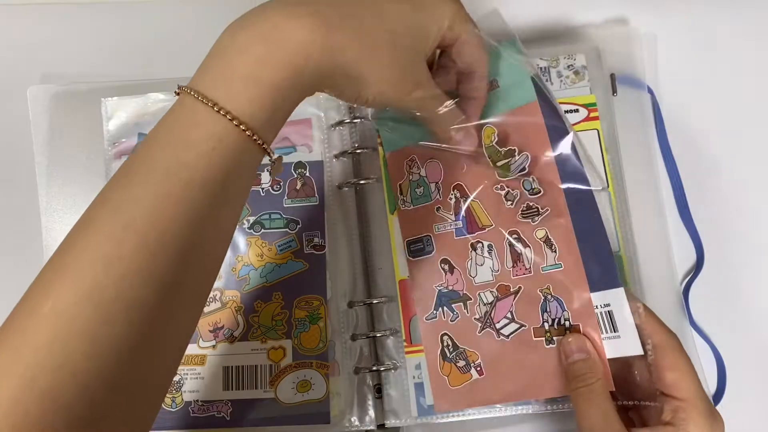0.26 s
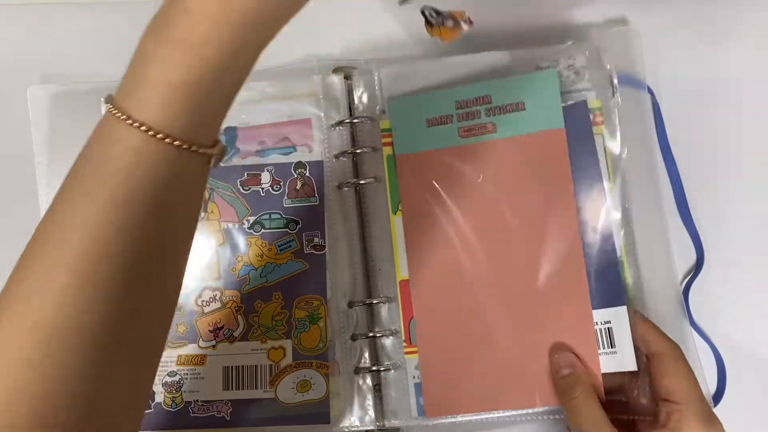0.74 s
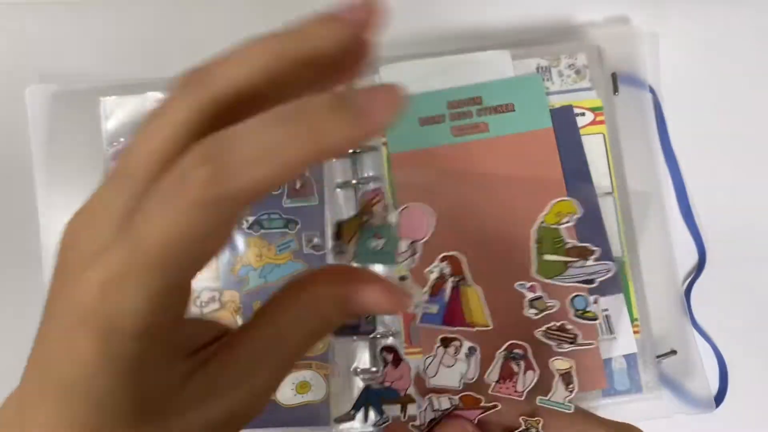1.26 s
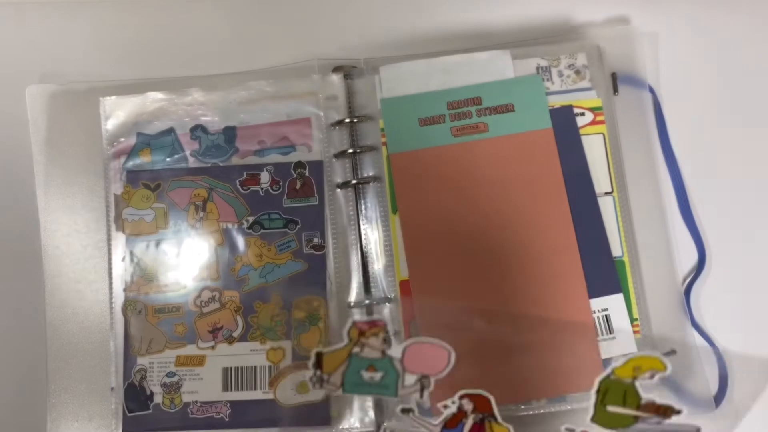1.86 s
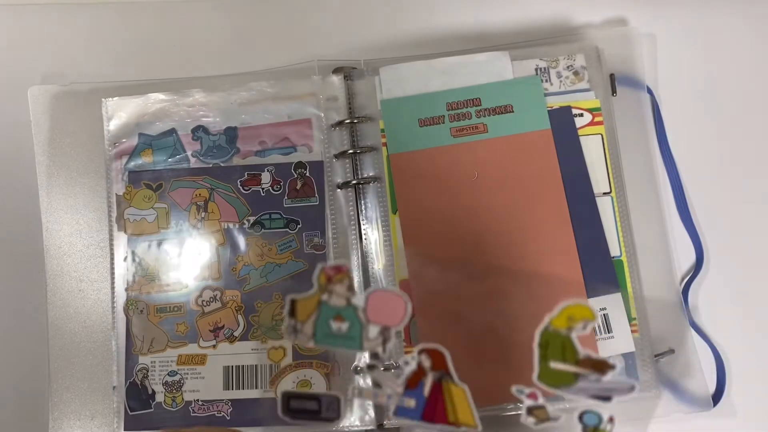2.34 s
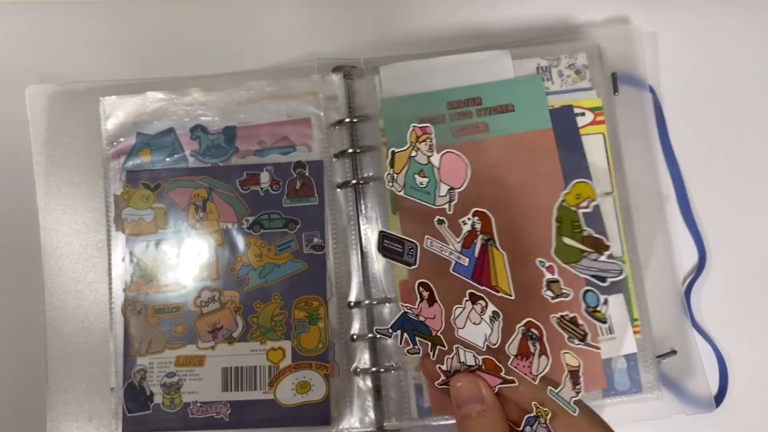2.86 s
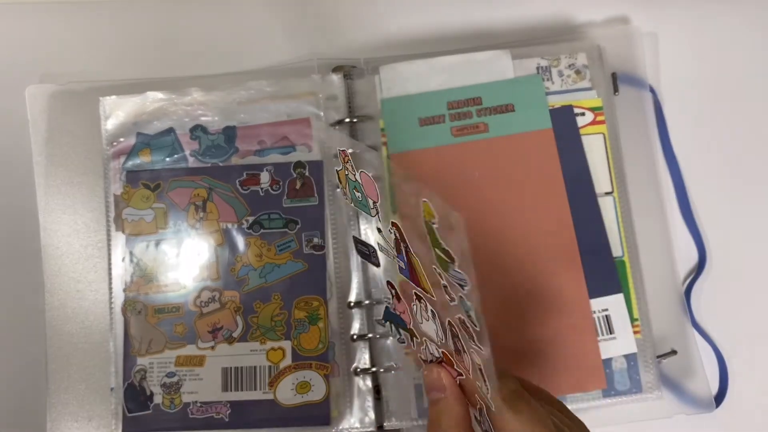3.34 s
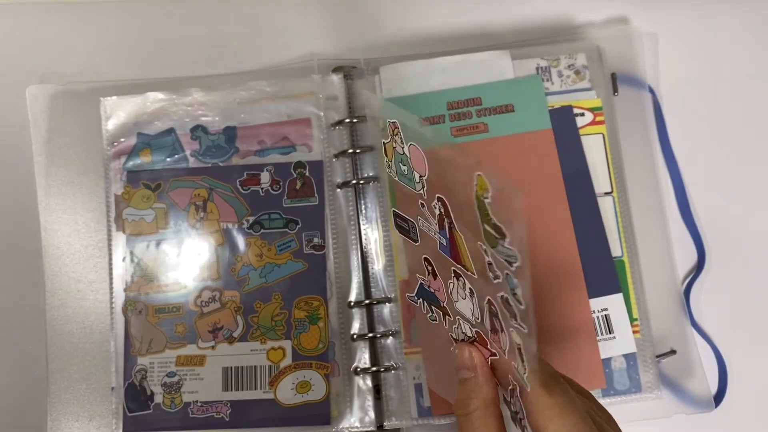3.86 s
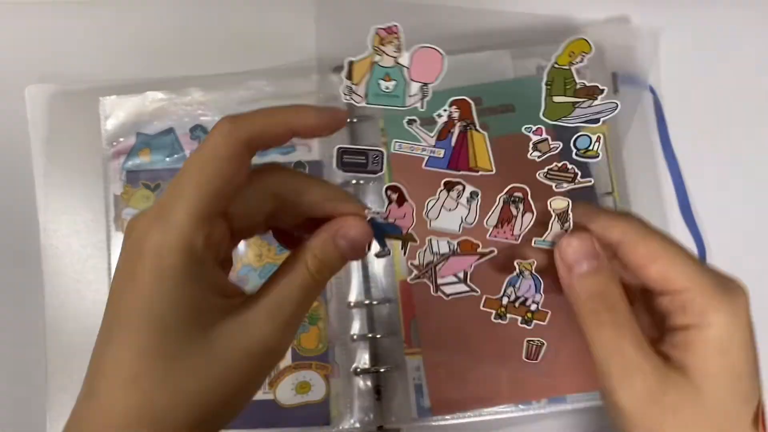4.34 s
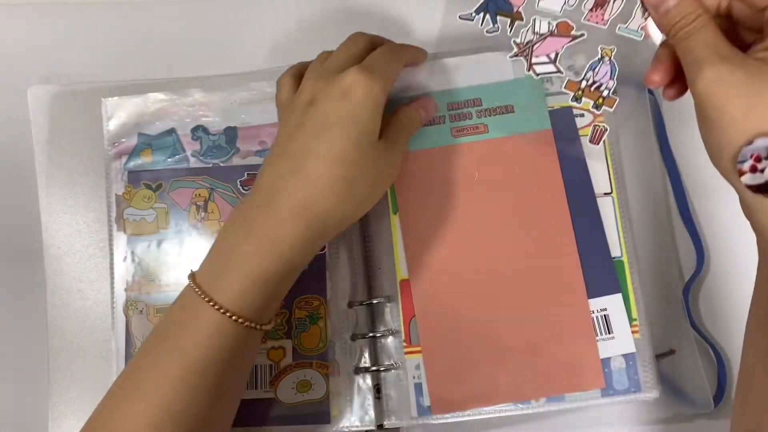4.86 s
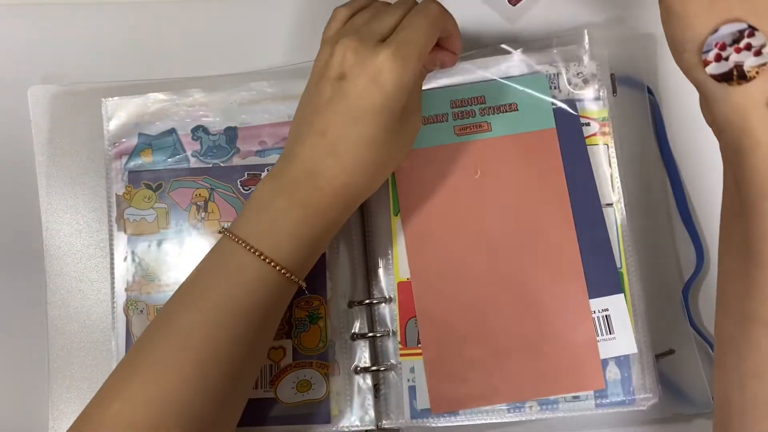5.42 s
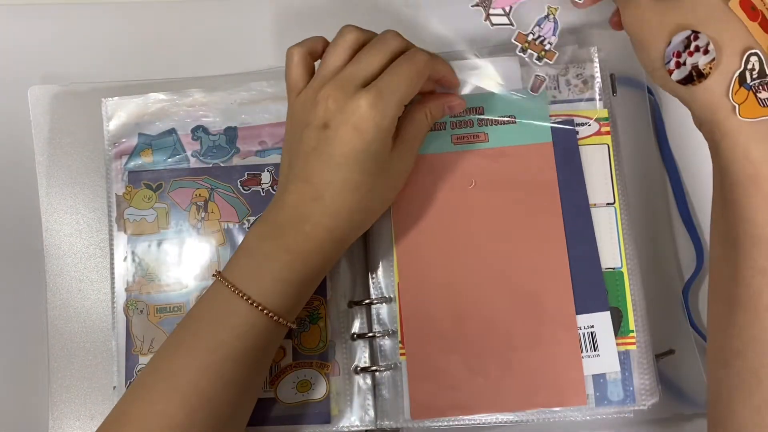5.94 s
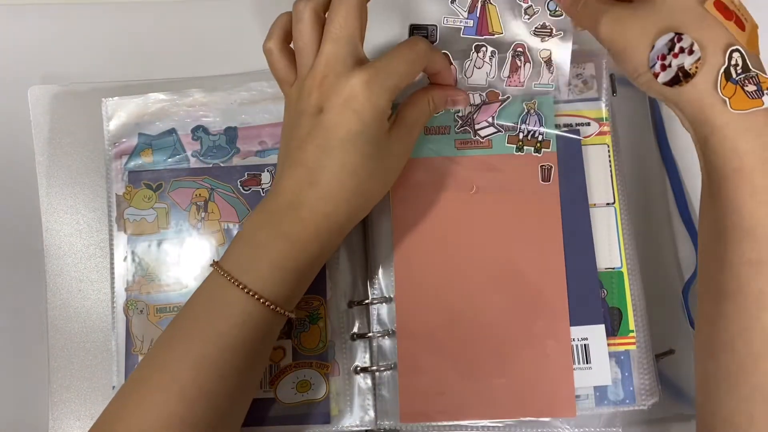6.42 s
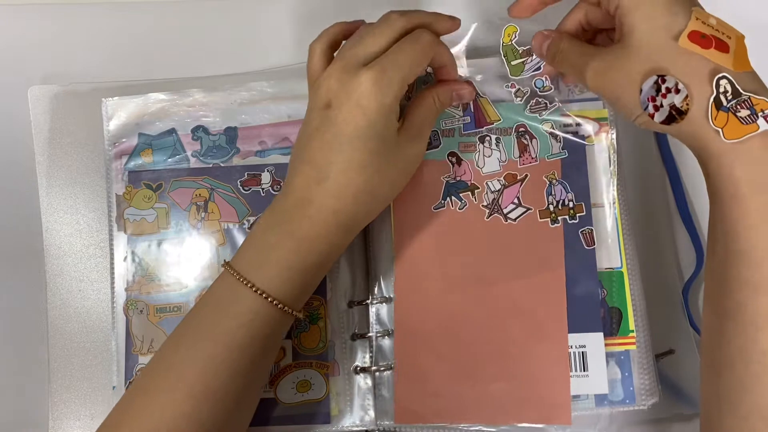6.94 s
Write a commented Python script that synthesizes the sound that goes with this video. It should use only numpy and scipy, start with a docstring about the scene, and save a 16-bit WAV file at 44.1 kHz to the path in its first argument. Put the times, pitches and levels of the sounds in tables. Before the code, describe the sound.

Close dry plastic snaps and sliding hiss, a quiet gap, a sharp crackle, then softer crinkling, with low hum and a vehicle fading early.

```python
"""Handling a stiff plastic sheet

A sticker sheet is drawn out of a binder sleeve, flexed in the hand and pushed back in, close by in a small room.
Buckles snap as dispersed ticks and crackle, slow bends ring sinking modes, and sliding film is filtered
random slips with small creases ticking. An appliance (wavering tones and shaped noise) hums throughout;
a distant vehicle (road noise, rumble and whine) fades away in the first seconds."""
import sys
import numpy as np
from scipy import signal
from scipy.fft import rfft, irfft
from scipy.io import wavfile
from scipy.ndimage import uniform_filter1d

SR = 44100
rng = np.random.default_rng(int(sys.argv[2]) if len(sys.argv) > 2 else 0)


def digitize_waveform(pressure):
    """Quantize a signal to 16-bit integers and store it at the path in sys.argv[1].

    Rows of a 2-D input are taken as channels; values are limited to [-1, 1].
    """
    field = np.atleast_2d(pressure).T
    bounded = np.clip(field, -1, 1)
    quanta = np.round(bounded * 32767).astype(np.int16)
    wavfile.write(sys.argv[1], SR, quanta)


N = 316638
TIME = np.arange(N) / SR  # [s]
BINS = np.fft.rfftfreq(N, 1 / SR)  # [Hz]
DAMPING_HZ = 2545  # reference frequency for the film's damping and dispersion


def gain_of(db):
    """Level to amplitude: twenty decibels are a factor of ten."""
    return 10 ** (np.asarray(db) / 20)


def evened(x):
    """Normalisation: scales a signal to an rms of one."""
    return x / np.sqrt(np.mean(x ** 2) + 1e-20)


def read(points, hz):
    """Spectral interpolation: reads a table on a logarithmic frequency axis."""
    f, value = np.transpose(points)
    return np.interp(np.log(hz + 1), np.log(f + 1), value)


def add(mix, s, sound):
    """Superposition: adds a sound into the mix at time s."""
    part = mix[max(round(s * SR), 0):][:len(sound)]
    part += sound[:len(part)]


def drift(rate_hz):
    """Slow random fluctuation: low-passed noise with an rms of one."""
    noise = rfft(rng.standard_normal(N))
    return evened(irfft(noise / (1 + (BINS / rate_hz) ** 4), N))


def hump(hz, centre_hz, width_hz):
    """Resonance curve: a Lorentzian peak of height one."""
    return 1 / (1 + (2 * (hz - centre_hz) / width_hz) ** 2)


def sheet_db(hz):
    """Plate resonance: the modes that colour the film's snaps and friction."""
    # ringing of the sheets and the binder: (centre [Hz], width [Hz], peak height [dB])
    modes = [(1116, 44, 0), (1570, 51, 4.5), (1945, 38, 4), (2550, 52, 5), (3100, 70, 1), (4230, 87, 4.5)]
    return sum(db * hump(hz, centre, width) for centre, width, db in modes)


def causal(db):
    """Minimum phase: the response with this gain that rings only after it is struck."""
    log_gain = np.log(gain_of(np.r_[db, db[-2:0:-1]]))
    return np.exp(np.conj(signal.hilbert(log_gain)))[:len(db)]


def resonate(x, hz, width_hz):
    """Tracking resonance: a double pole in a rotating frame follows a pitch curve."""
    turn = np.exp(2j * np.pi * np.cumsum(hz) / SR)
    r = np.exp(-np.pi * width_hz / SR)
    smoothed = signal.lfilter([(1 - r) ** 2], [1, -2 * r, r * r], x / turn)
    return 2 * (turn * smoothed).real


def ambient(spectrum):
    """Diffuse field: two noise channels whose correlation depends on frequency."""
    # likeness of the two sides for sound from all around: (frequency [Hz], correlation [-1 to 1])
    likeness = [(60, 0.44), (130, 1), (290, 0.066), (640, -0.82), (3000, -0.17)]
    a, b = rfft(rng.standard_normal((2, N)))
    same = np.clip(read(likeness, BINS), -1, 1)
    pair = np.array([a, same * a + np.sqrt(1 - same ** 2) * b])
    return evened(irfft(pair * gain_of(read(spectrum, BINS)), N))


def appliance(hum_hz=60, overtones_db=2.5, air_db=-58, waver=0.0013):
    """Motor hum and flow noise: wavering tones over a rush of air."""
    # level of the fundamental: (time [s], rms level [dB])
    hum_levels = [(0, -49.5), (0.2, -57.5), (0.7, -44.5), (1.15, -48.5), (1.35, -55.5), (2.13, -44.5),
                  (2.35, -46.5), (7.1, -50.5)]
    # higher tones, all lifted by overtones_db: (nominal frequency [Hz], relative level [dB])
    overtones = [(118.4, -66), (236.9, -77), (279.9, -71.5)]
    # spectrum of the rushing air: (frequency [Hz], relative level [dB])
    air = [(30, -36), (52, 7.5), (72, -6), (110, -2.5), (180, -12.5), (285, -10), (420, -17.5), (720, -25),
           (1500, -41), (8000, -52), (16000, -75.5)]
    hum_gain = gain_of(np.interp(TIME, *np.transpose(hum_levels)))
    hum = hum_gain * np.sin(2 * np.pi * np.cumsum(hum_hz * (1 + waver * drift(0.87))) / SR)
    for hz, db in overtones:
        tone_gain = gain_of(db + overtones_db + drift(7.9))
        hum += tone_gain * np.sin(2 * np.pi * np.cumsum(hz * (1 + waver * drift(4.3))) / SR)
    return np.sqrt(2) * hum + gain_of(air_db) * ambient(air)


def vehicle(lumps_db=2.5, lumps_hz=7):
    """Passing source: road noise, a lumpy rumble and a whine that mostly sinks in pitch."""
    # nominal course of the passage:
    # (time [s], road noise [dB], engine rumble [dB], whine pitch [Hz], whine level [dB])
    passage = [(0, -59.5, -47, 326.6, -60.5), (0.799, -54.5, -53, 307.8, -55.5),
               (1.25, -58, -57, 296.8, -58.5), (1.5, -56.5, -54, 288, -64.5),
               (2.15, -57.5, -47.5, 283, -71.5), (2.35, -80, -64, 287, -71.5)]
    # spectra of tyre noise and engine: (frequency [Hz], relative level [dB])
    road = [(100, -5.5), (200, 1.5), (600, 2), (1100, 1), (1700, -7), (2700, -11.5), (5800, -22),
            (11000, -51)]
    engine = [(35, -31), (52, -4), (70, -12.5), (95, 5.5), (125, -14.5), (185, -14), (400, -80)]
    s, *columns = np.transpose(passage)
    road_db, rumble_db, whine_hz, whine_db = (np.interp(TIME, s, c) for c in columns)
    whine_gain = np.sqrt(2) * gain_of(whine_db + 1.1 * drift(4))
    whine = whine_gain * np.sin(2 * np.pi * np.cumsum(whine_hz * (1 + 0.0084 * drift(7.0))) / SR)
    rumble = gain_of(rumble_db + lumps_db * drift(lumps_hz)) * ambient(engine)
    gone = np.clip((TIME - s[-1]) / 0.12, 0, 1)
    return (1 - gone) * (gain_of(road_db) * ambient(road) + rumble + whine)


def stroke_gains(attack_s=0.019, release_t60_s=0.047, release_share=0.99, held_db=-92.5):
    """Energy addition: strokes with attack, swelling hold and release sum as powers."""
    # strokes of film over film, drawing out, then flexing, then pushing back in:
    # (start [s], hold length [s], hiss [dB], deeper scrape [dB], swell from start to end [dB])
    strokes = [ (0.0, 0.045, -43.5, -49, 1), (0.078, 0.19, -60.5, -58.5, -1),
               (0.16, 0.074, -51.5, -53, -6.5), (0.28, 0.12, -51, -57.5, 11.5),
               (0.395, 0.0997, -46.5, -44.5, 5), (0.517, 0.18, -48.5, -60, 4),
               (0.871, 0.05, -61.5, -61.5, 10), (1.114, 0.075, -69.5, -46.5, 6.5),
               (2.15, .14, -60.5, -65, -3.5), (2.329, 0.29, -66, -68.5, 18.5),
               (2.619, 0.18, -76, -68.5, -26.5), (3.975, 0.2, -73, -85.5, -12.5),
               (4.129, 0.16, -64.5, -55.5, -7.5), (4.328, 0.16, -74, -76, -5.5),
               (4.553, 0.27, -78, -69, -16), (4.865, 0.086, -69.5, -76, -2),
               (4.981, 0.44, -71, -70.5, 12.5), (5.341, 0.019, -49, -59.5, 9),
               (5.413, 0.083, -53.5, -58.5, 1), (5.562, .27, -66, -66.5, 11),
               (5.848, .15, -51.5, -55.5, -2), (5.999, 0.21, -51, -61, -1.5),
               (6.259, 0.11, -71, -67, -24.5), (6.426, .14, -56.5, -71, 7), (6.579, .11, -69, -79, 2),
               (6.704, .16, -61.5, -73.5, -6), (6.872, .3, -65.5, -76.5, 10.5),]
    # the fingers never keep the sheet quite still, so a faint floor remains
    power = gain_of([[held_db], [held_db]]) ** 2 * np.ones(N)
    for start, length, hiss_db, scrape_db, swell_db in strokes:
        release_t60 = release_t60_s + release_share * length
        t = np.arange(0, length + release_t60, 1 / SR)
        swell = swell_db * (np.minimum(t / length, 1) - .5)
        release = -60 * np.maximum(t - length, 0) / release_t60
        envelope = np.minimum(t / attack_s, 1) * gain_of(swell + release)
        add(power[0], start, (gain_of(hiss_db) * envelope) ** 2)
        add(power[1], start, (gain_of(scrape_db) * envelope) ** 2)
    return np.sqrt(power)


def friction(spectrum, grains_per_s):
    """Stick-slip: countless tiny slips of uneven size, coloured by the sheet."""
    slips = rng.standard_normal(N) * (rng.random(N) < grains_per_s / SR)
    colour_db = read(spectrum, BINS) + sheet_db(BINS)
    return evened(irfft(rfft(slips) * gain_of(colour_db), N))


def bending(x, echo=0.54, trip_s=.0012):
    """Comb filtering: edge reflections shift in colour as bending changes their trip."""
    delay = trip_s * gain_of(2 * drift(9.6))
    return evened(x + echo * np.interp(TIME - delay, TIME, x))


def slides(hiss_gain, scrape_gain, hiss_db=1, judder_db=1.37, catch_db=2.0, judder_hz=70, push_db=2.13, push_hz=16):
    """Sliding friction: a fine hiss, and a coarser scrape that catches and lets go."""
    # spectra of the hiss and the scrape: (frequency [Hz], relative level [dB])
    hiss_colour = [(600, -24), (1600, -10), (2800, -1), (7000, 0), (9500, -3), (16000, -15)]
    scrape_colour = [(100, -3.5), (400, 13), (620, 0), (900, 3.5), (1500, -5.5), (2700, -11), (6000, -21.5),
                     (16000, -46)]
    hiss = hiss_gain * gain_of(hiss_db) * friction(hiss_colour, grains_per_s=19000)
    scrape = scrape_gain * bending(friction(scrape_colour, grains_per_s=2900))
    push = gain_of(push_db * drift(push_hz))  # the hand does not push evenly
    catch = gain_of(catch_db * drift(judder_hz))
    judder = gain_of(judder_db * drift(judder_hz))
    return push * (hiss + scrape * catch) * judder


def crinkle(hiss_gain, scrape_gain, level_db=-7, hiss_db=-11, per_s=300, spread_db=5,
            low_hz=900, high_hz=3900, clump_db=4, count=24):
    """Snap-through: creases flip in clumps during strokes, each a dry tick of a few cycles."""
    t, out = np.arange(SR // 50) / SR, np.zeros(N)
    pitches = np.geomspace(low_hz, high_hz, count) * gain_of(rng.uniform(-0.36, 0.66, count))
    for hz in pitches:
        sizes = gain_of(spread_db * np.minimum(rng.exponential(1, N), 3))
        flips = (rng.random(N) < per_s / count / SR) * sizes
        tick = np.cos(2 * np.pi * hz * t) * np.exp(-t * hz / 2)
        out += signal.oaconvolve(flips, tick)[:N]
    stroke_gain = scrape_gain * gain_of(level_db) + hiss_gain * gain_of(hiss_db)
    return stroke_gain * evened(out * gain_of(clump_db * drift(38)))


def free_edge(x, ring_hz=3450, width_hz=420, wander_db=1.65, wander_hz=3, ring_db=-3):
    """Sympathetic resonance: the loose edge sings with the friction as its pitch wanders."""
    pitch = ring_hz * gain_of(wander_db * drift(wander_hz))  # the decibels here scale frequency
    return x + gain_of(ring_db) * resonate(x, pitch, width_hz)


def crackle(t, t60, rise_s=0.00051, clump_db=4, damping=0.14, even_hz=900):
    """Frequency-dependent damping: a spectrally evened spray of slips loses treble first."""
    hz = np.fft.rfftfreq(len(t), 1 / SR)
    grains, clumps = rng.standard_normal((2, len(t)))
    slips = rfft(grains * gain_of(clump_db * evened(uniform_filter1d(clumps, 30))))
    centres, spray = np.geomspace(500, 16000, 6), 0
    for centre, own in zip(centres, np.eye(len(centres))):
        band_t60 = max(t60, .005) * (DAMPING_HZ / centre) ** damping
        band = irfft(slips * read(np.c_[centres, own], hz))  # own selects one overlapping band
        spray = spray + band * (1 - np.exp(-t / rise_s)) * gain_of(-60 * t / band_t60)
    z = rfft(spray)
    local_power = np.convolve(abs(z) ** 2, np.hanning(int(even_hz / hz[1])), "same")
    return z / np.sqrt(local_power)


def burst(sound, db):
    """Energy scaling: a short sound gets the energy of 7.1 ms at this rms level."""
    return gain_of(db) * evened(sound) * np.sqrt(0.0071 * SR / len(sound))


def snaps(lead_s=0.00028, ring_share=0.64, ring_width=0.26, tick_db=-6, travel_s=.0006, size=4096):
    """Buckling and dispersion: a tick and dying slips ring a patch; low bending waves arrive later."""
    # buckles and taps of the film, drawn out, then flexed, then pushed back in:
    # (time [s], level [dB], ring pitch [Hz], approximate fall away from it [dB per octave],
    #  nominal crackle t60 at DAMPING_HZ, at least 5 ms in use [s])
    buckles = [ (0.006, -41.5, 8100, 4, 0.015), (0.046, -34.5, 4020, 6, .035),
               (0.0605, -27.5, 971, 11, 0.01), (0.136, -47, 4400, 7, 0.023), (0.1851, -18, 3782, 10, .016),
               (0.408, -40.5, 1310, 8, 0.014), (0.4198, -24, 1700, 8, 0.0043),
               (0.435, -29.5, 2950, 11.5, 0.015), (0.46, -28.5, 1150, 7, 0.044),
               (0.493, -36, 3460, 17, 0.017), (0.513, -40, 1780, 13.5, 0.0043),
               (0.747, -41.5, 3280, 6.5, 0.012), (0.854, -45, 9000, 1.5, 0.049),
               (1.108, -42.5, 2630, 8, 0.033), (1.1281, -38, 2700, 12, 0.025), (1.151, -49, 3000, 13, .025),
               (1.173, -41, 1500, 7, 0.0087), (2.384, -57, 1220, 2.5, 0.057), (2.482, -51, 1050, 6, 0.016),
               (2.5704, -27, 5200, 4, 0.0064), (2.575, -20, 4100, 3, 0.025),
               (2.579, -31, 1640, 14.5, 0.079), (2.6085, -31, 2600, 2.5, 0.0081),
               (2.6186, -24, 7000, 0, 0.0039), (2.6194, -24.5, 1889, 9, 0.04),
               (2.866, -63.5, 3000, -1, 0.024), (3.799, -53, 9390, 6, 0.018),
               (3.897, -55, 9940, 10.5, 0.055), (3.989, -53.5, 2860, 2, 0.064),
               (4.1451, -34.5, 2480, 8.5, 0.0092), (4.173, -41.5, 1830, 8, 0.047),
               (4.439, -53, 885, 7.5, 0.031), (4.654, -60, 2500, 26, 0.018),
               (4.671, -57.5, 2706, 12, 0.028), (5.307, -42.5, 1730, 8.5, 0.0067),
               (5.358, -44.5, 8900, 3, 0.017), (5.4367, -36.5, 1500, 5, 0.018),
               (5.48, -38, 1110, 7, 0.0099), (5.557, -46.5, 3110, 9, 0.0081),
               (5.708, -42.5, 3200, 3.5, 0.012), (5.724, -51.5, 3600, 5.5, 0.0062),
               (5.8409, -46, 1400, 5.5, 0.0055), (5.92, -40.5, 1200, 7.5, 0.1),
               (5.953, -44.5, 2640, 14, 0.014), (5.982, -46, 2700, 22.5, 0.02),
               (6.136, -44.5, 3550, 5.5, 0.0047), (6.155, -43.5, 900, 6, 0.018),
               (6.171, -41.5, 990, 4, 0.027), (6.1902, -38.5, 1360, 5, 0.0052),
               (6.193, -45, 435, 12.5, 0.015), (6.23, -39, 4670, 4, 0.035), (6.417, -53, 944, 8, 0.026),
               (6.779, -44.5, 1116, 2.5, 0.03), (6.85, -50.5, 3760, 7.5, 0.045)]
    # colour common to all snaps: (frequency [Hz], relative level [dB])
    snap_colour = [(60, -6.5), (160, 6), (260, -2), (450, 1.5), (650, -6), (950, 2.5), (1500, -6),
                   (4300, -2), (5600, -1), (8600, 1), (16000, -12.5)]
    brighten, neutral_db, treble_hz = 0.12, -34.5, 7040  # treble [dB per dB of level], [dB], [Hz]
    t, hz, out = np.arange(size) / SR, np.fft.rfftfreq(size, 1 / SR), np.zeros(N)
    colour_db = read(snap_colour, hz) + sheet_db(hz)
    dispersion = np.exp(-4j * np.pi * travel_s * DAMPING_HZ * np.tanh(np.sqrt(hz / DAMPING_HZ)))
    for s, db, ring_hz, fall_db, t60 in buckles:
        # a stiff patch rings at one pitch; a slack one cracks over all of them
        octaves = np.log2((hz + 1) / ring_hz)
        away = 3.67 * np.tanh(abs(octaves) / 3.8) * np.where(octaves < 0, .8, 1)
        ring_db = fall_db * (ring_share * hump(hz, ring_hz, ring_width * ring_hz) - away)
        # a harder snap has more of the top treble
        treble_db = brighten * (db - neutral_db) * hz ** 2 / (hz ** 2 + treble_hz ** 2)
        response = causal(colour_db + treble_db + ring_db) * dispersion
        tick = gain_of(tick_db) * evened(np.roll(irfft(response), 20))
        sound = tick + evened(irfft(response * crackle(t, t60)))
        sound = sound * np.clip((t[-1] - t) / .02, 0, 1) ** 2  # fade to silence
        add(out, s - lead_s, burst(sound, db))
    return out


def flexes(sag_octaves=0.49, width_share=.22, rise_share=0.059, clump_db=4, damping=.5, size=8192):
    """Modal ringing: clumped slips excite modes that sink as the sheet slackens, high ones dying first."""
    # slow bends of the whole sheet: (time [s], decay constant at the pitch [s], level [dB], starting pitch [Hz])
    bends = [ (0.708, .014, -39, 1106), (0.748, .016, -40, 1103), (1.128, .022, -36.5, 1170),
             (1.169, .016, -37, 1120), (1.19, .007, -39.5, 1230), (2.643, .007, -40.5, 1345),
             (4.142, .008, -36.5, 1043), (4.267, 0.0096, -55, 1750), (4.321, 0.013, -47.5, 877),
             (4.57, 0.019, -41.5, 1380), (4.669, 0.014, -50.5, 1076), (4.71, 0.0077, -60, 1284),
             (5.19, 0.02226, -56.5, 1320), (5.839, .009, -43.5, 1196), (5.974, 0.012, -38, 1308)]
    # modes of a bending sheet: (multiple of its pitch [ratio], relative level [dB])
    bend_modes = [(.38, -9), (.68, -2.5), (1, 3), (1.38, -4.5), (2.05, -7), (2.75, -15.5)]
    t, out = np.arange(size) / SR, np.zeros(N)
    for s, length, db, hz in bends:
        grains, clumps = rng.standard_normal((2, size))
        clumping = gain_of(clump_db * evened(uniform_filter1d(clumps, size=64)))
        slips = grains * clumping * np.minimum(t / (rise_share * length), 1)
        pitch = hz * 2 ** (-sag_octaves * np.tanh(.5 * t / length))
        sound = np.zeros(size)
        for k, mode_db in bend_modes:
            dying = slips * np.exp(-t / length * k ** damping)
            mode = resonate(dying, k * pitch, width_share * hz * np.sqrt(k))
            sound += gain_of(mode_db) * evened(mode)
        add(out, s, burst(sound, db))
    return out


def room(x, early_db=-10, early_t60=0.076, wall_db=-17, wall_s=0.016, tail_db=-20, size=22050):
    """Reverberation: quick desk reflections, a smeared echo from the nearest wall, and a faint tail."""
    # decay of the tail: (frequency [Hz], t60 [s])
    tail_t60 = [(1000, 0.3), (16000, 0.0057)]
    t = np.arange(size) / SR
    taps = rng.choice([-1., 1.], (3, size)) * (rng.random((3, size)) < 4000 / SR) * (t > .001)
    desk = evened(taps[0] * gain_of(-60 * t / early_t60))  # alike on both sides
    wall = evened(taps[1:] * np.exp(-((t - wall_s) / 0.002) ** 2))
    hz, frames, z = signal.stft(taps[1:], SR, nperseg=256)
    decay = gain_of(-60 * frames / read(tail_t60, hz)[:, None])
    tail = evened(signal.istft(z * decay, SR, nperseg=256)[1][:, :size])
    response = gain_of(early_db) * desk + gain_of(wall_db) * wall + gain_of(tail_db) * tail
    return signal.fftconvolve(x[None], response / np.sqrt(size), axes=1)[:, :N]


def scene():
    """Interaural phase: the film leads on the left; hum and traffic noise is diffuse, their tones central."""
    # phase of the microphone pair: (frequency [Hz], lead of left over right [rad])
    lead = [(400, 0.68), (750, 1.76), (1600, 0.73), (2800, 1.01), (3700, 0.52), (5300, 1.41), (8500, 3),
            (11500, 3), (16000, 9)]
    hiss_gain, scrape_gain = stroke_gains()
    rubbing = slides(hiss_gain, scrape_gain) + crinkle(hiss_gain, scrape_gain)
    film = snaps() + flexes() + free_edge(rubbing)
    lag = np.exp(-1j * read(lead, BINS) * np.array([[0], [1]]))
    near = rfft(film + room(film)) * lag
    return irfft(near, N) + appliance() + vehicle()


def record(dry):
    """Linear filtering: the two microphones differ in colour, then a low-pass limits the band."""
    # balance of the pair: (frequency [Hz], left minus right [dB])
    balance = [(60, 0), (290, -8), (640, -4.5), (1400, -0.5), (4000, -2.5), (8000, -0.5)]
    tilt_db = read(balance, BINS) * np.array([[.5], [-.5]])
    tilted = irfft(rfft(dry) * gain_of(tilt_db), N)
    edge_hz = 16200
    low_pass = signal.firwin(511, edge_hz, window=("kaiser", 9), fs=SR)
    return signal.oaconvolve(tilted, low_pass[None], "same")


dry = scene()
out = record(dry)
digitize_waveform(out)
```